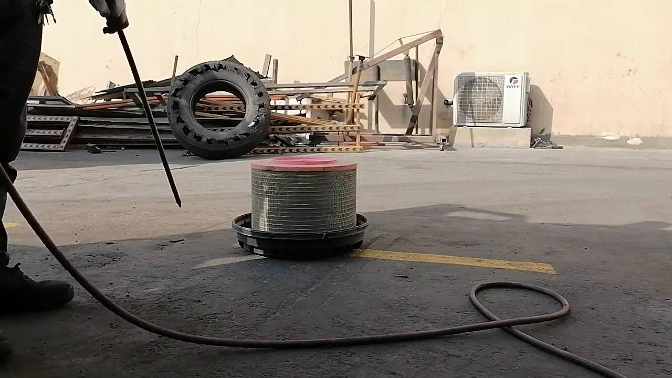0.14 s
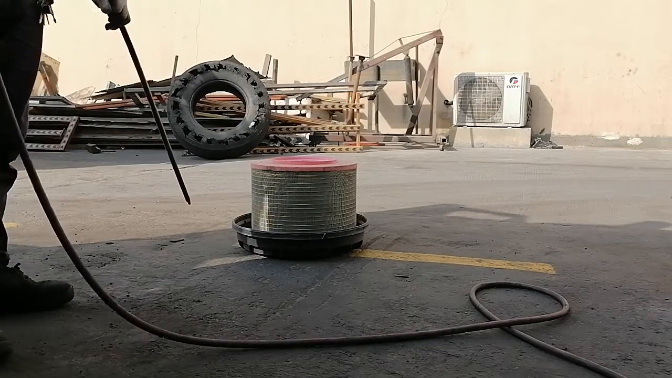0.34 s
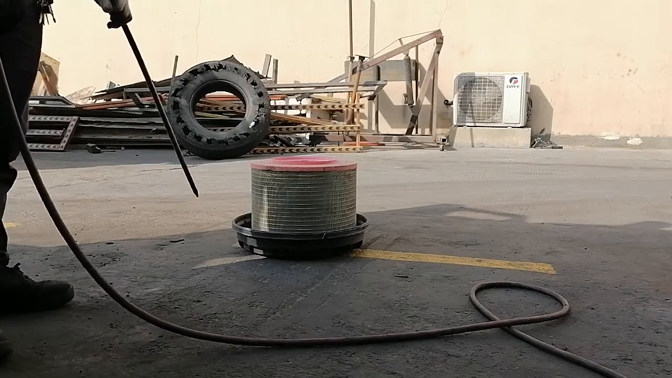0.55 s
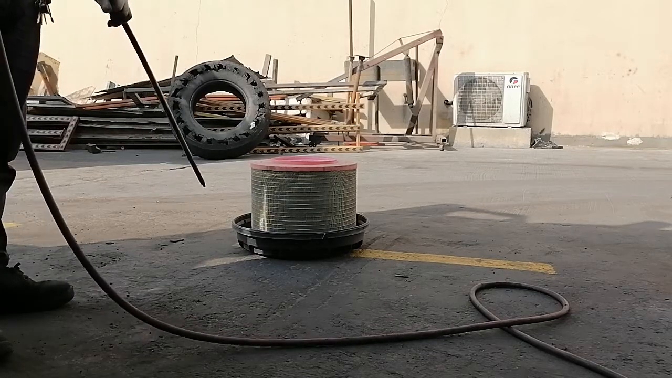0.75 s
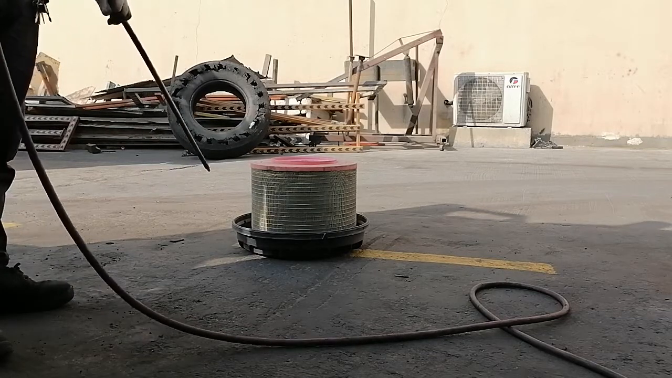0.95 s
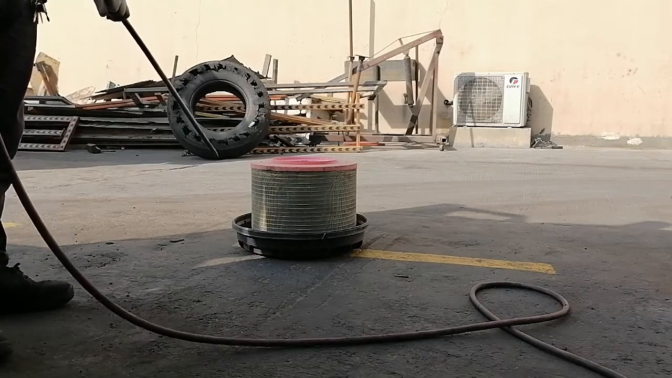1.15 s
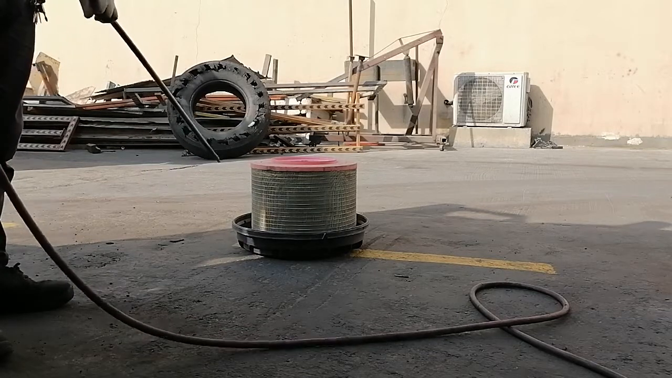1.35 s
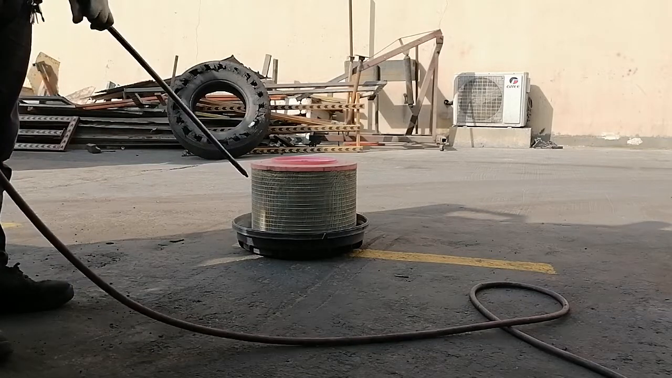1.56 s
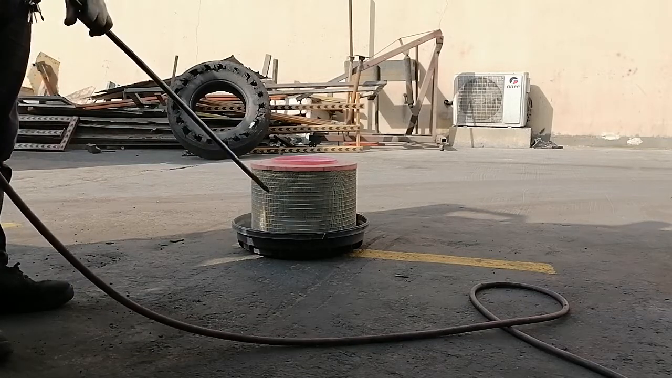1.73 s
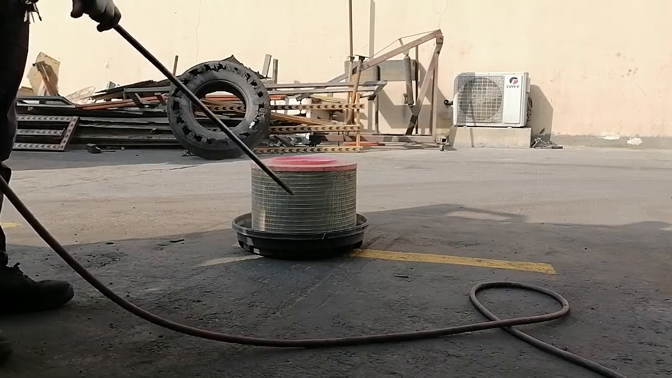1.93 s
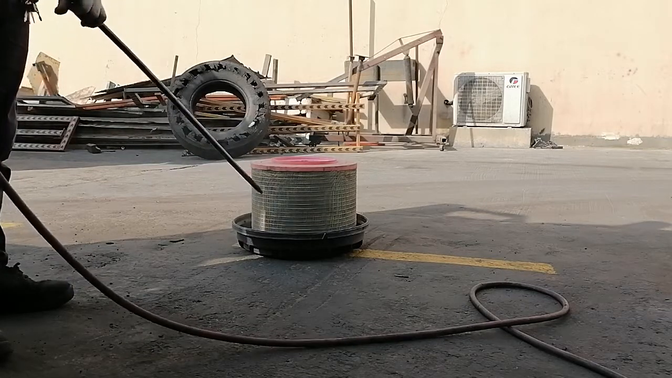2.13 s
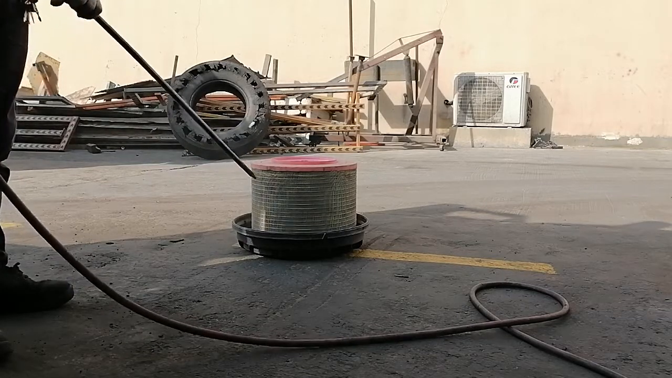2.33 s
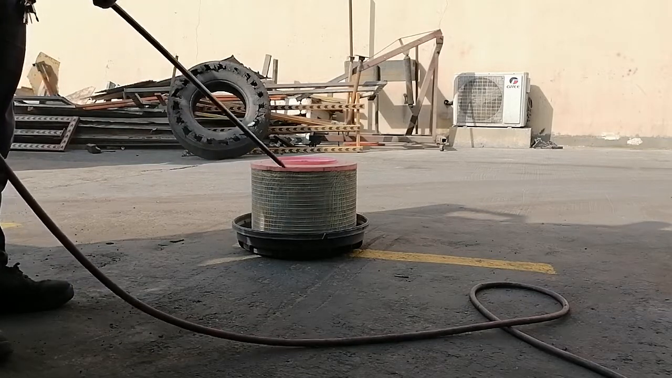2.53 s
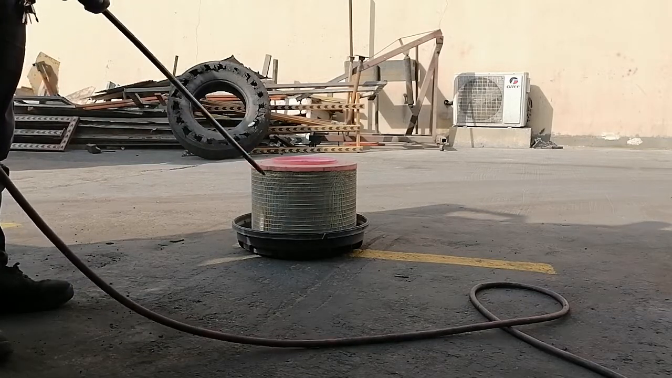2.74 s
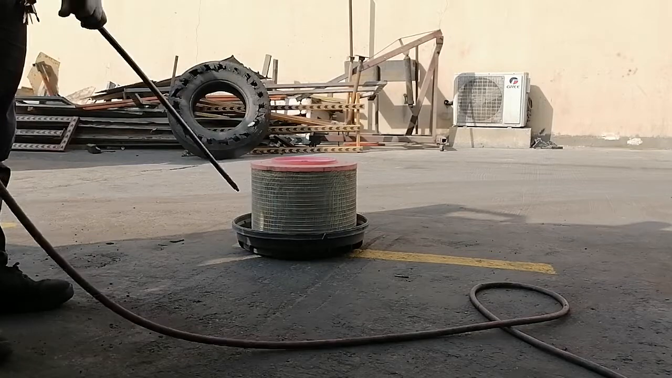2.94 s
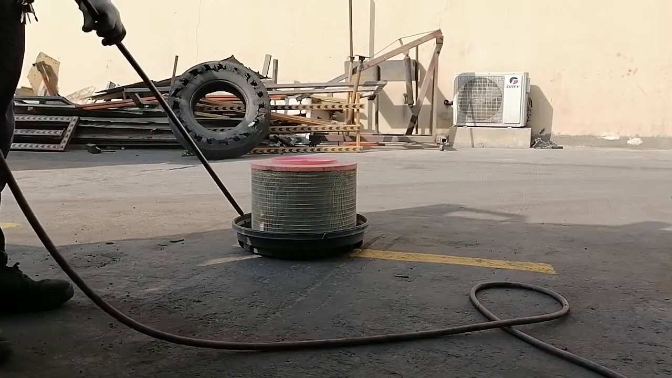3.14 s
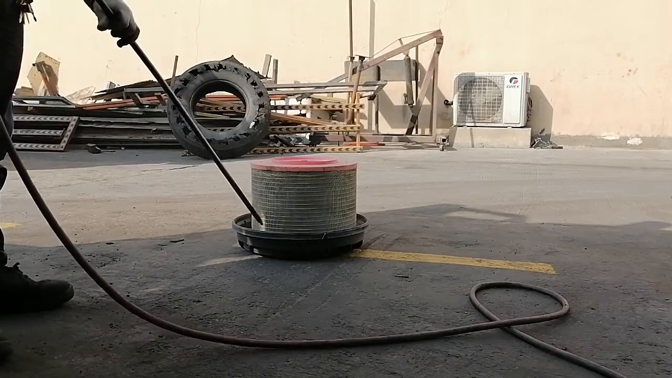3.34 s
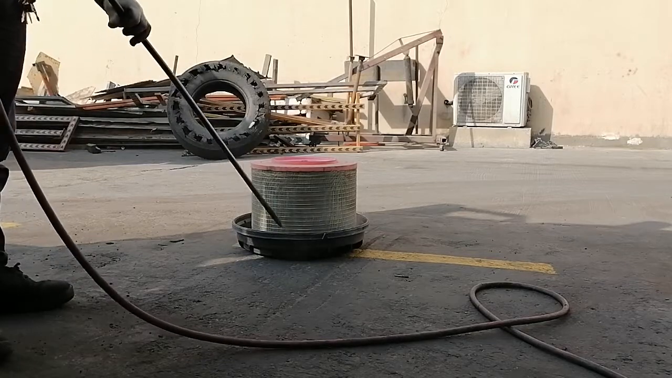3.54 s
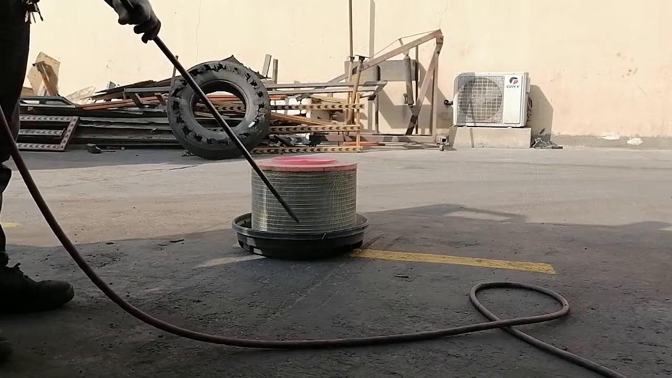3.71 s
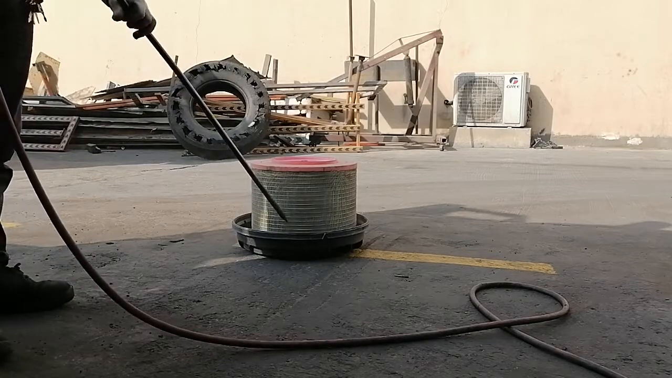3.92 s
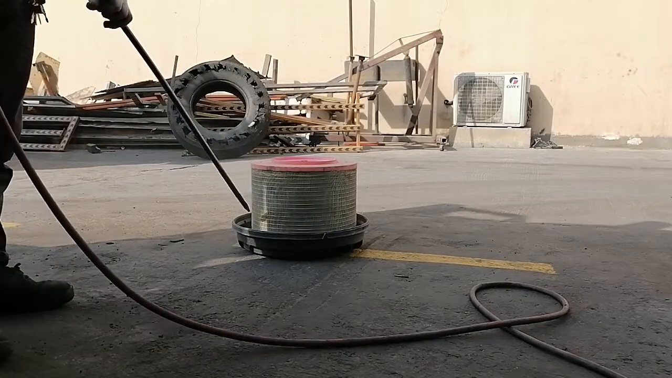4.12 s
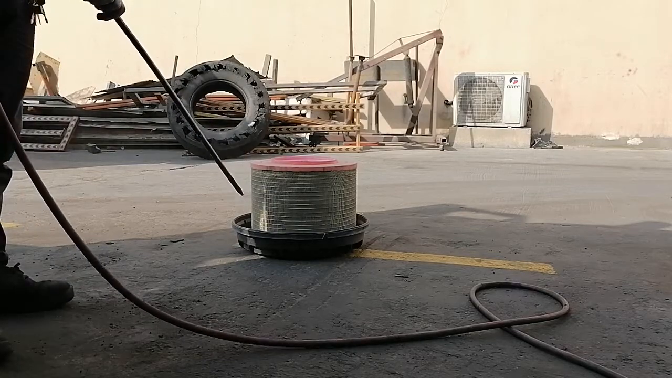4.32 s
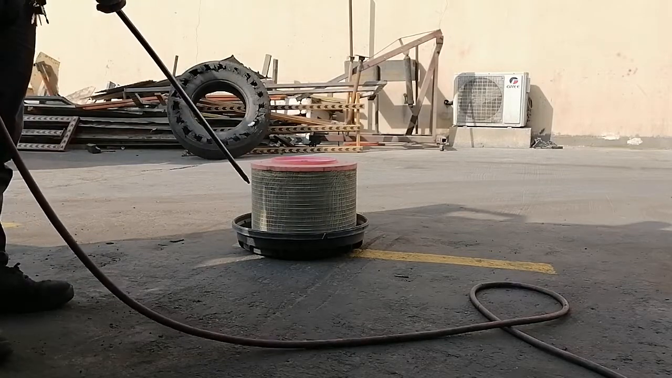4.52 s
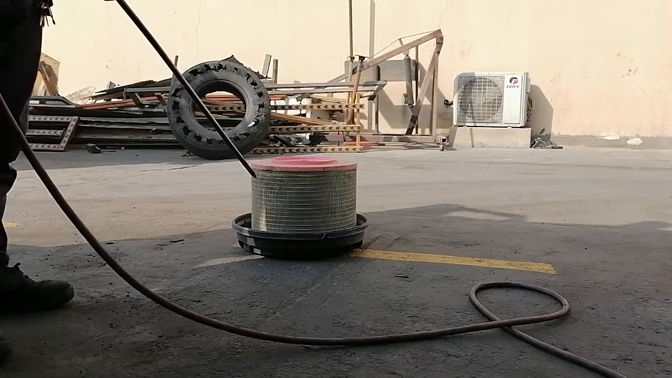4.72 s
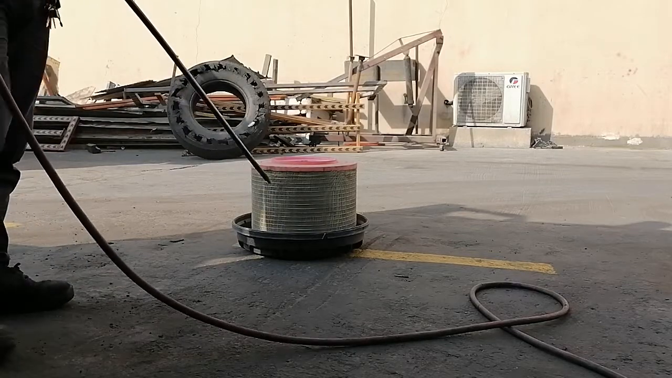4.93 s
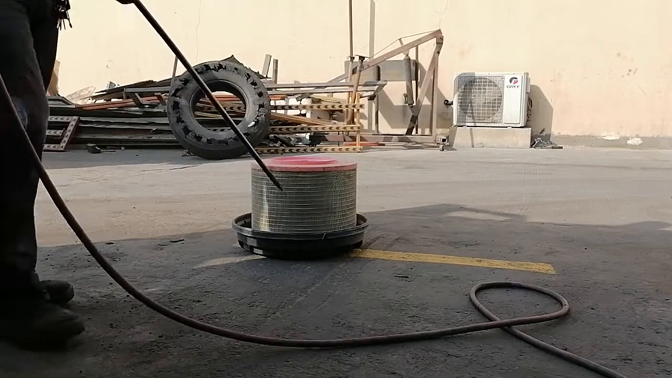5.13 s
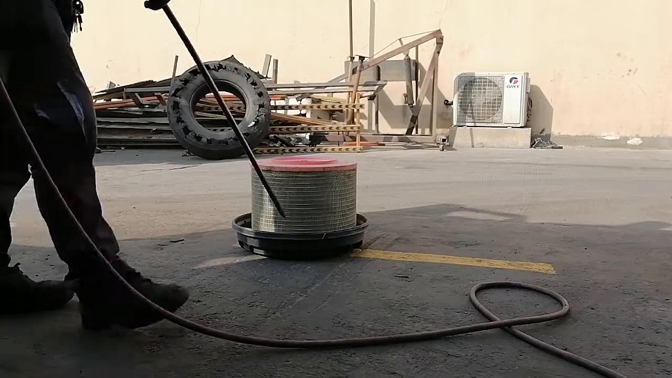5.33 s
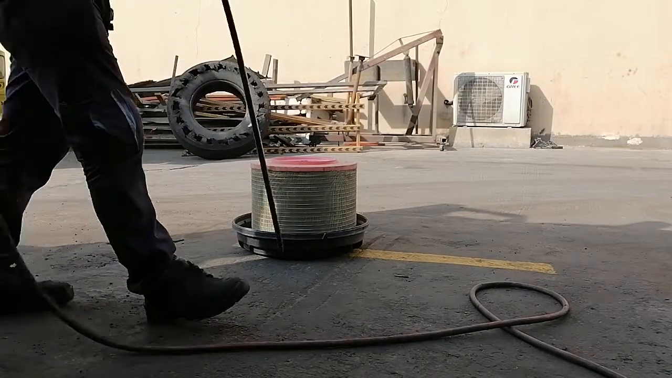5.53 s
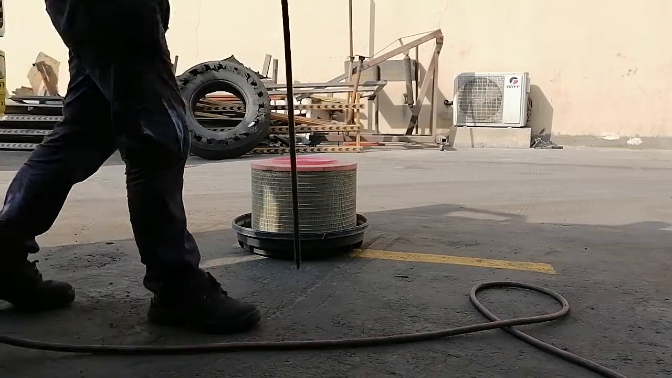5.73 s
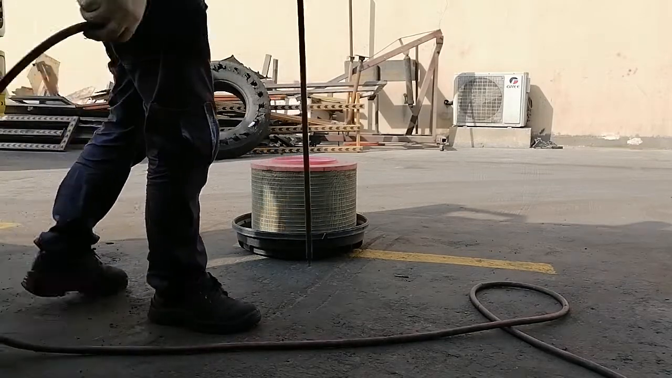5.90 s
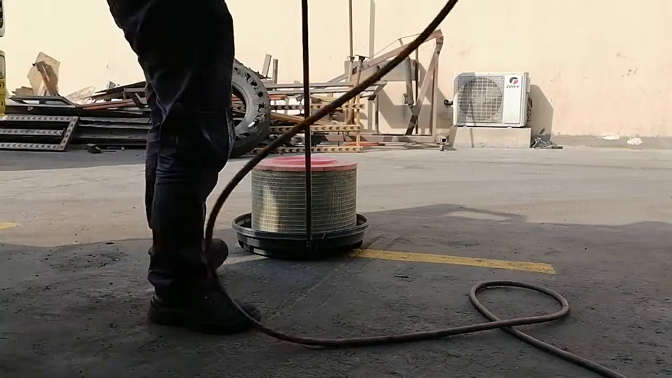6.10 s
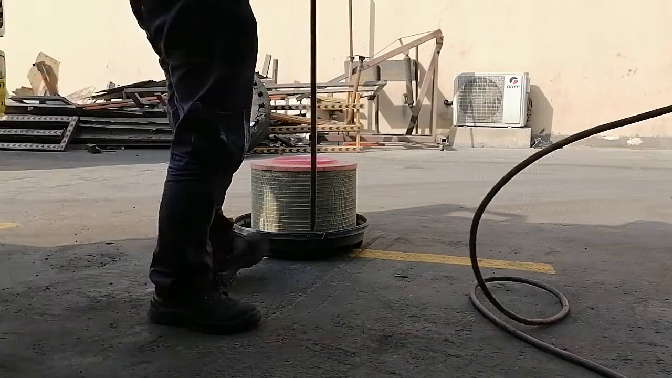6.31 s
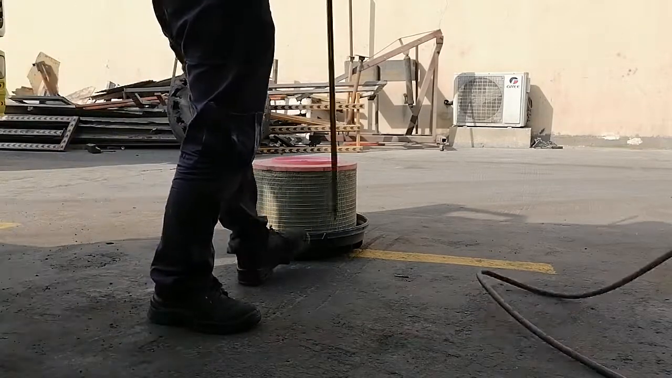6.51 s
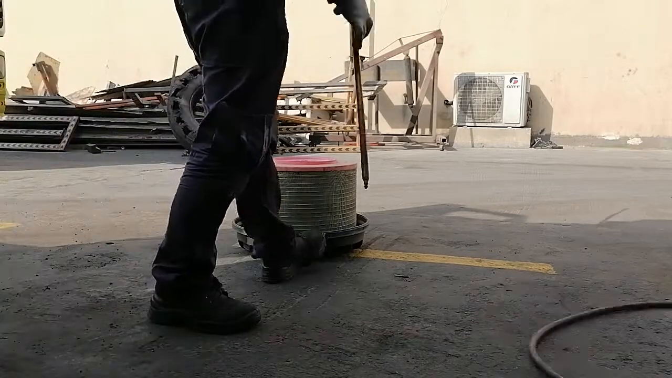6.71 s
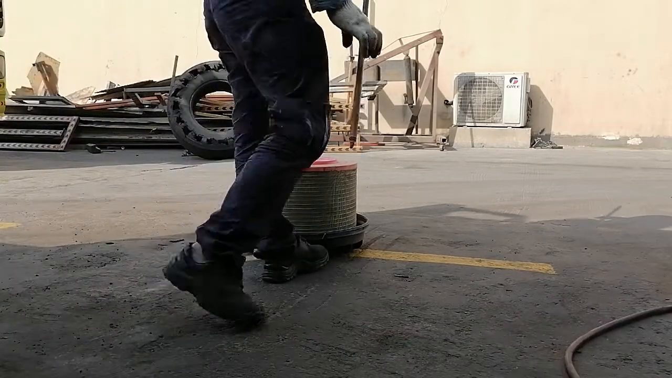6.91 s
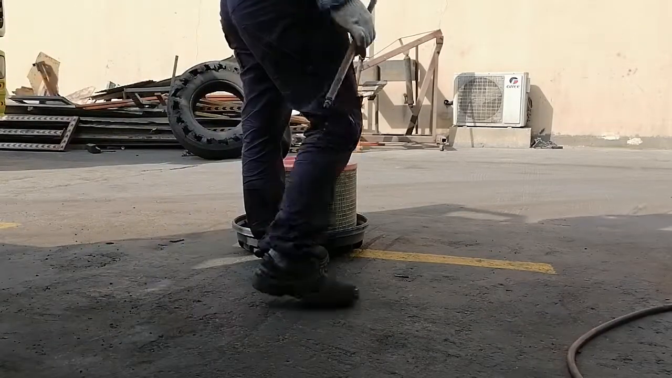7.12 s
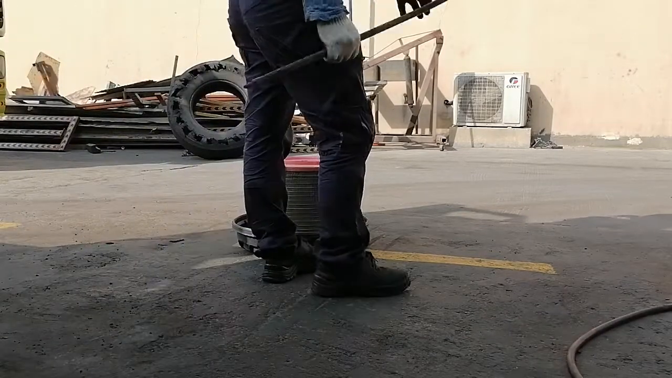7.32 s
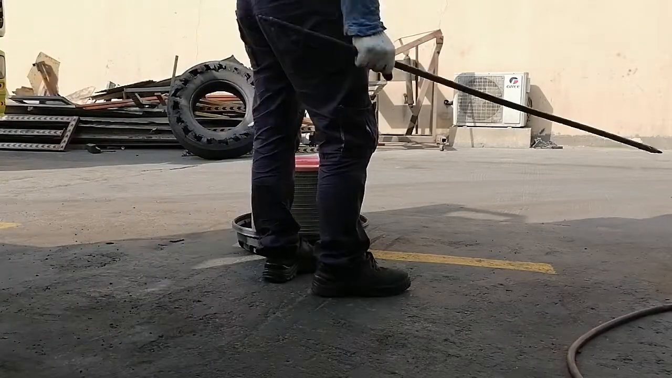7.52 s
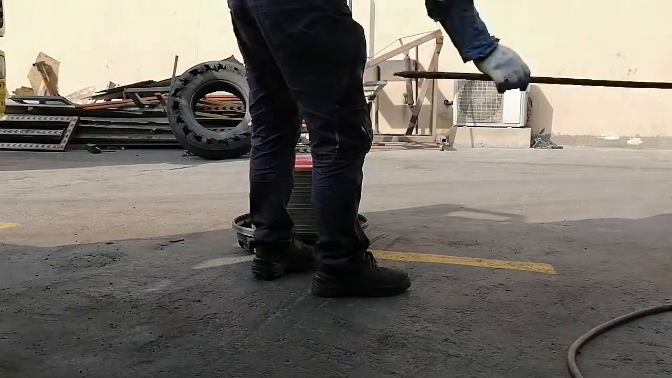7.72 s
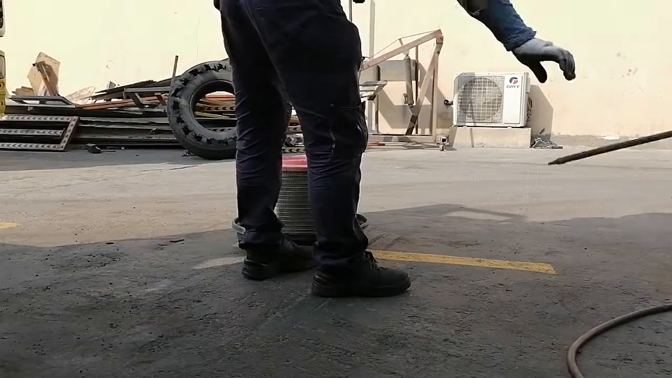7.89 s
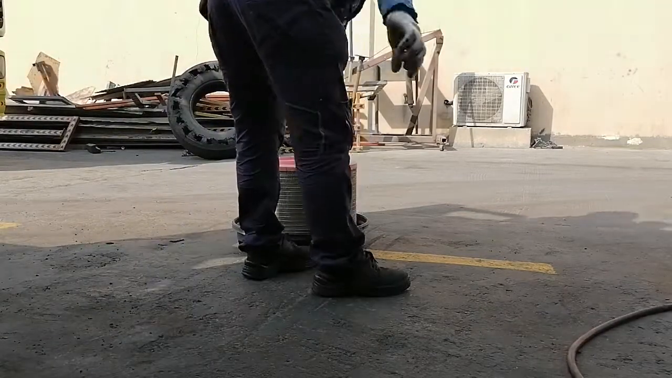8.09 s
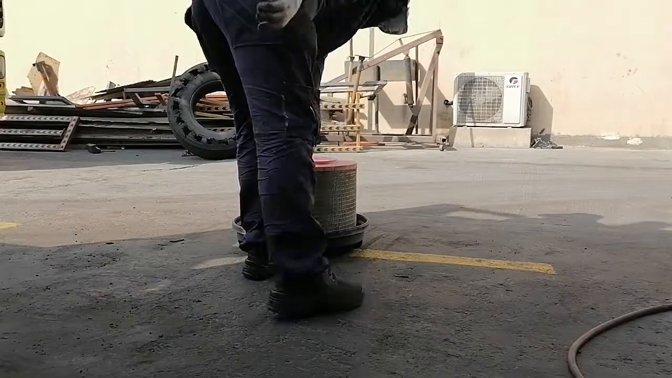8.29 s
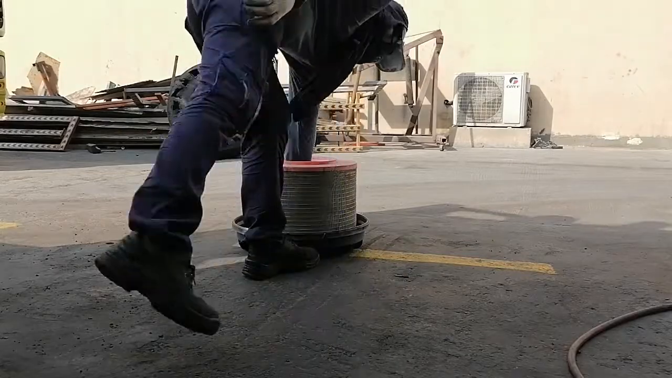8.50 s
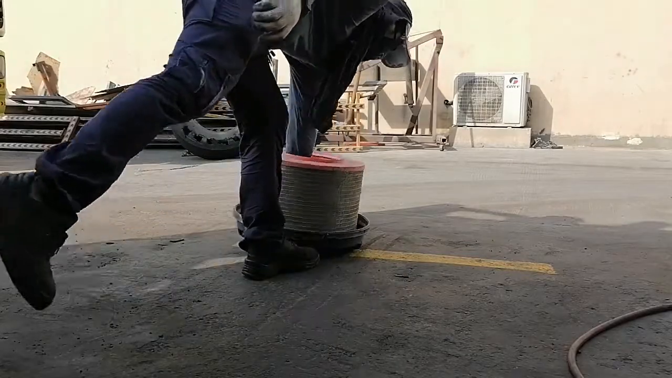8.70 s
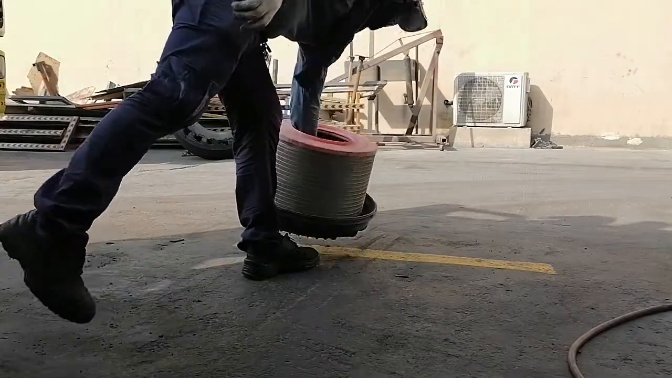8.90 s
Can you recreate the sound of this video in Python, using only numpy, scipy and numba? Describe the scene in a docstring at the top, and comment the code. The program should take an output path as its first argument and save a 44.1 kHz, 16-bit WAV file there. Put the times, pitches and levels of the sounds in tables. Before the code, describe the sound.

Compressed air hisses steadily from a lance into a filter, then a hose uncouples with two spurts and the steel lance clatters down ringing.

```python
"""Air lance in a concrete yard

Over a low rumble, a worker blows out an air filter with a long steel lance. The turbulent jet hisses,
comb-filtered by its moving ground reflection, and roars where it enters the pleats. The hose uncouples
with a squeak and two spurts of air; the lance is dropped and rings in its bending modes at each bounce.
An automatic gain control ducks the whole sound, rumble included, while the treble is strong."""
import sys
import numpy as np
from scipy import signal
from scipy.fft import rfft, irfft, next_fast_len
from scipy.io import wavfile
from scipy.ndimage import map_coordinates
from numba import njit

SR = 44100
rng = np.random.default_rng(int(sys.argv[2]) if len(sys.argv) > 2 else 0)


def file_out(sig):
    """Save sig as 16-bit WAV at sys.argv[1]."""
    # one column per channel
    cols = np.atleast_2d(sig).T
    # limit, then scale
    lim = np.clip(cols, -1, 1)
    pcm = np.round(lim * 32767).astype(np.int16)
    wavfile.write(sys.argv[1], SR, pcm)


N = 394689
T = np.arange(N) / SR


def undb(db):
    """Amplitude ratio of a level in decibels."""
    return 10 ** (np.asarray(db) / 20)


def unit(x):
    """Normalisation to rms 1."""
    return x / np.sqrt(np.mean(x ** 2))


def curves(rows):
    """Linear interpolation of a table's columns in time."""
    times, *columns = np.transpose(rows)
    return [np.interp(T, times, column) for column in columns]


def noise(spectrum, size=N):
    """Spectral shaping: noise of rms 1 through (frequency [Hz], level [dB]) points, with sloping ends."""
    n = next_fast_len(size, True)
    hz, db = np.transpose(spectrum)
    f = np.arange(n // 2 + 1) * SR / n + 1
    gain = undb(np.interp(np.log(f), np.log(hz), db))
    roll_off = np.minimum(f / hz[0], 1) * np.minimum(hz[-1] / f, 1) ** 2
    return unit(irfft(rfft(rng.standard_normal(n)) * gain * roll_off, n)[:size])


def wide(spectrum, side_db, size=N):
    """Partial coherence: a common noise plus a side noise in antiphase between the channels."""
    side = undb(side_db) * noise(spectrum, size)
    return unit(noise(spectrum, size) + np.array([side, -side]))


def walk(rate_hz, size=N):
    """Random modulation: interpolated Gaussian values with a spread near 1."""
    steps = rng.standard_normal(int(size / SR * rate_hz) + 2)
    return 1.53 * np.interp(np.arange(size) / SR * rate_hz, np.arange(len(steps)), steps)


def delayed(x, ms):
    """Propagation delay, constant or varying in time."""
    return map_coordinates(x, [np.arange(len(x)) - ms * SR / 1000], order=3)


def from_right(x, lag_ms):
    """Time difference of arrival: a source on the right reaches the left channel later."""
    return np.array([delayed(x, lag_ms), x])


def fade(t, t60):
    """Exponential decay, by 60 dB in t60 seconds."""
    return np.exp(-np.log(1000) * t / t60)


def envelope(s, hold, rise, fall):
    """Gaussian rise to 1 at time s, hold, exponential decay; rise and fall are the times for 20 dB."""
    return undb(-20 * ((np.maximum(s - T, 0) / rise) ** 2 + np.maximum(T - s - hold, 0) / fall))


def add(out, s, x):
    """Superposition of a two-channel sound starting at time s."""
    i = int(s * SR)
    out[:, i:i + x.shape[1]] += x[:, :N - i]


def yard(x, wet_db, size=22050):
    """Reverberation: the wall and stacked scrap add diffuse reflections, uncorrelated left and right."""
    t = np.arange(size) / SR
    decay = fade(t, t60=0.48) + 3.3 * fade(t, t60=0.029)
    tail = rng.standard_normal((2, size)) * decay * (t > .002)
    tail /= np.sqrt(np.sum(tail ** 2, axis=1, keepdims=True))
    return x + undb(wet_db) * signal.fftconvolve(x, tail, axes=1)[:, :N]


# rumble as the worker steps, shifts and bends: (time [s], hold [s], rise [s], fall [s], level [dB])
RUMBLE_SWELLS = [(5.3, 0.12, 0.26, 0.29, -45), (5.95, .1, 0.25, 1, -53.5), (8.398, .2, 0.39, .3, -47),
                 (8.87, .08, 0.42, .3, -41.5)]
# spectra of the yard's rumble and faint hiss: (frequency [Hz], relative level [dB])
RUMBLE_SPECTRUM = [(20, -3), (40, 5), (80, 0.5), (160, -2), (270, -3.5), (400, -13), (650, -18.5),
                   (1500, -52)]
AMBIENT_SPECTRUM = [(200, 4), (700, 1), (1100, 0), (2000, -8), (3000, -8), (3950, -14.5), (4500, -2.5),
                    (4750, -8), (5100, -1), (5800, -12), (7300, -4), (9000, -16.5), (12500, -24.5),
                    (15000, -30)]


def background():
    """Ambient noise: a largely coherent rumble, whose swells add in power, and a faint diffuse hiss."""
    swells = sum(undb(db) * envelope(*timing) for *timing, db in RUMBLE_SWELLS)
    rumble = np.hypot(undb(-52.5), swells) * undb(0.87 * walk(14)) * wide(RUMBLE_SPECTRUM, side_db=-13)
    hiss = undb(-59.5 + 0.5 * walk(3.4)) * wide(AMBIENT_SPECTRUM, side_db=0.47)
    return rumble + hiss


# a low hum and thin whistles in the yard: (frequency [Hz], bandwidth [Hz], relative level [dB])
TONES = [(263.6, 16, -64), (4440, 60, -81), (5173, 90, -86)]


def tones():
    """Narrow-band noise: random quadrature parts make each tone drift in amplitude and phase."""
    out = np.zeros((2, N))
    for hz, width_hz, db in TONES:
        phase = 2 * np.pi * hz * T
        for channel in out:
            channel += undb(db) * (walk(width_hz) * np.cos(phase) + walk(width_hz) * np.sin(phase))
    return out


# ticks of the lever and the hose in the hand: (time [s], level [dB])
TICKS = [(0.806, -50.5), (.838, -47.5), (0.9223, -38.5), (7.18, -55), (7.244, -55)]
# spectra of a tick and of the spit of air: (frequency [Hz], relative level [dB])
TICK_SPECTRUM = [(1200, -28), (2400, 2.5), (4000, -9), (5800, 2), (6800, -4), (7900, 7), (9500, -17),
                 (15000, -25)]
SPIT_SPECTRUM = [(4500, -22), (5400, 2), (5900, 0), (6600, -16), (9000, -25)]


def trigger(size=8000):
    """Damped transients: handling ticks, and a spit of air as the lever takes up its slack."""
    out, t = np.zeros((2, N)), np.arange(size) / SR
    tick_decay = fade(t, t60=0.025) + .12 * fade(t, t60=0.35)
    for s, db in TICKS:
        add(out, s, undb(db) * tick_decay * wide(TICK_SPECTRUM, 1.5, size))
    spit = undb(-56.5) * fade(t, t60=0.38) * wide(SPIT_SPECTRUM, -1, size)
    add(out, .925, spit)
    return yard(out, wet_db=-11)


def valve(t60, open_s=1.1765, shut_s=5.13):
    """Gating of the flow: a fast linear onset, then exponential decay once the valve shuts."""
    return np.clip((T - open_s) / 0.016, 0, 1) * fade(np.maximum(T - shut_s, 0), t60)


# the open jet, duller beside the filter: (time [s], hiss level [dB], fine spray level [dB])
JET_LEVELS = [(1.2, -30.5, -35.5), (1.5, -30.5, -33.5), (1.72, -31, -32), (1.95, -27.5, -34),
              (2.1, -28.5, -31), (2.62, -30, -33.5), (2.84, -34, -33), (2.94, -37, -38), (3.6, -32, -42),
              (3.95, -33.5, -39.5), (4.2, -36.5, -39.5), (4.65, -32, -31.5), (5.1, -32.5, -35.5)]
# rise and fall of the nozzle: (time [s], height [m])
NOZZLE_HEIGHTS = [(1.2, 0.35), (1.68, .31), (1.87, .19), (2.3, 0.24), (2.45, 0.4), (2.7, 0.37), (3.1, 0.17),
                  (3.85, 0.18), (4.6, .26), (4.9, .32)]
# the jet grazes a filter edge: (time [s], hold [s], rise [s], fall [s], rasp [dB], added hiss [dB])
GRAZES = [(1.581, .025, 0.078, 0.059, -37.5, -36), (1.79, 0.062, .06, 0.22, -37, -31),
          (2.084, .2, 0.2, .1, -34.5, -41), (2.337, 0.023, 0.048, .08, -35.5, -33),
          (2.842, 0.065, 0.063, 0.1, -39, -34), (3.19, 0.1, 0.093, .15, -42.5, -60),
          (3.267, 0.13, 0.053, 0.18, -50, -53), (3.849, 0.053, 0.25, 0.086, -42, -34.5),
          (4.478, 0.28, 0.23, .4, -40.5, -39), (4.995, 0.066, 0.15, 0.093, -44, -34)]
# brief dips in the jet's level: (time [s], hold [s], rise [s], fall [s], depth [dB])
DIPS = [(2.48, 0.016, 0.069, .015, 6.5), (2.723, 0.043, 0.049, 0.08, 4)]
# spectra of the jet's three parts: (frequency [Hz], relative level [dB])
HISS_SPECTRUM = [(400, -36), (1600, -59), (2700, -18), (4200, -14.5), (6000, -4), (7200, 6.5), (8200, 4.5),
                 (9200, -9.5), (11000, -44), (15500, -34)]
RASP_SPECTRUM = [(1200, -58), (2000, -7.5), (2700, 3), (3300, 3), (4000, -4.5), (5200, 5), (6500, -5.5),
                 (10000, -27)]
SPRAY_SPECTRUM = [(7000, -2), (9800, 8), (11500, 4.5), (14000, 2), (15000, 6.5), (16000, -14)]
LISTENER_HEIGHT_M, DISTANCE_M, SOUND_SPEED_M_S = 0.446, 2.65, 343


def jet():
    """Turbulent jet noise, rasping at edges; interference with its ground echo sweeps a comb filter."""
    hiss_db, spray_db = curves(JET_LEVELS)
    hiss, rasp = undb(hiss_db), undb(hiss_db - 17)  # in open air the rasp is weak
    for *timing, rasp_db, added_db in GRAZES:
        touch = envelope(*timing)
        hiss = np.hypot(hiss, undb(added_db) * touch)
        rasp = np.hypot(rasp, undb(rasp_db) * touch)
    parts = [(hiss, HISS_SPECTRUM), (rasp, RASP_SPECTRUM), (undb(spray_db), SPRAY_SPECTRUM)]
    air, left, right = (sum(gain * noise(spectrum) for gain, spectrum in parts) for _ in range(3))
    # the concrete mirrors the nozzle as an image source
    height_m, = curves(NOZZLE_HEIGHTS)
    extra_path_m = 2 * height_m * LISTENER_HEIGHT_M / DISTANCE_M
    air = air + undb(-5.5) * delayed(air, ms=1000 * extra_path_m / SOUND_SPEED_M_S)
    # the jet is on the left: later and weaker on the right
    direct = valve(t60=0.037) * np.array([air, undb(-2) * delayed(air, ms=0.059)])
    # hiss scattered round the yard outlasts the flow
    diffuse = undb(-0.5) * valve(t60=0.27) * np.array([left, right])
    flutter_db = .5 * (walk(16) + walk(45) + walk(300))
    dip_db = sum(depth_db * envelope(*timing) for *timing, depth_db in DIPS)
    return (direct + diffuse) * undb(flutter_db - dip_db)


# sweeps of the jet into the pleats:
# (time [s], hold [s], rise [s], fall [s], level [dB], centre frequency [Hz], glide [octaves/s])
PASSES = [(1.492, 0.083, 0.047, 0.053, -43, 517.6, 1.9), (2.021, 0.049, .24, 0.23, -46, 900.7, 1),
          (2.279, 0.041, 0.18, 0.065, -46.5, 880, -.5), (3.141, 0.12, .25, .11, -32.5, 890.3, 2),
          (3.38, .3, 0.1024, 0.081, -47, 998.5, -.1), (3.82, .03, .16, .12, -36.5, 881.2, -.6),
          (4.2, .12, .15, 0.28, -35, 900.2, -2.5)]
# spectrum of the roar before it glides: (frequency [Hz], relative level [dB])
ROAR_SPECTRUM = [(150, -12), (300, -8.5), (500, -1), (800, 3), (1100, -0.5), (1600, -9), (2200, -16.5),
                 (4000, -29)]


def pleats(glide_span_s=.25):
    """Jet impingement: a hollow, fluttering roar whose spectral peak slides with the spot struck."""
    gains, centres = [], []
    for s, hold, rise, fall, db, hz, glide in PASSES:
        gains.append(undb(db) * envelope(s, hold, rise, fall))
        centres.append(hz * 2 ** (glide * np.clip(T - s, -glide_span_s, glide_span_s)))
    centre_hz = np.average(centres, axis=0, weights=np.array(gains) + 1e-9)
    # reading the noise at a varying speed moves its peak to the centre frequency
    peak_hz = ROAR_SPECTRUM[3][0]
    hollow = map_coordinates(noise(ROAR_SPECTRUM), [np.cumsum(centre_hz / peak_hz)], order=3, mode="wrap")
    flutter = undb(0.56 * walk(60))
    buffeting = undb(-15.5) * noise(RUMBLE_SPECTRUM)
    roar = valve(t60=.1) * sum(gains) * flutter * (hollow + buffeting)
    return yard(np.array([roar, undb(-3) * roar]), wet_db=-6)


# squeaks of the coupling's seal: (time [s], duration [s], frequency [Hz], left level [dB])
SQUEAKS = [(6.7645, 0.004, 7600, -35.5), (6.795, .006, 7300, -36), (6.804, 0.0038, 7630, -17.5),
           (6.816, .012, 7480, -27), (7.7475, 0.0018, 7560, -30.5)]


def seal(size=30000, lead_s=.02):
    """Random frequency modulation: the seal squeaks in short tone pulses with Gaussian envelopes."""
    out, t = np.zeros((2, N)), np.arange(size) / SR
    for s, duration, hz, db in SQUEAKS:
        swell = np.exp(-((t - lead_s) / (duration / 2)) ** 2)
        tone = np.sin(2 * np.pi * np.cumsum(hz + 160 * walk(1510, size)) / SR)
        add(out, s - lead_s, from_right(undb(db) * swell * tone, lag_ms=.41) * [[1], [1.5]])
    return out


# spectrum of the sliding sleeve: (frequency [Hz], relative level [dB])
SLEEVE_SPECTRUM = [(600, 0), (1500, 2), (2800, -1), (4000, -18), (7500, -5), (10000, -21)]


def sleeve():
    """Sliding friction: a short scrape as the coupling's sleeve is pulled back."""
    swell = np.exp(-((T - 6.79) / 0.016) ** 2)
    return undb(-44) * swell * wide(SLEEVE_SPECTRUM, side_db=0)


def ring(modes, forces, lag_ms, scatter_db, waver_hz, size):
    """Modal superposition: damped modes of steel on the right, with reflections that shift as it turns."""
    t, out = np.arange(size) / SR, 0
    for (hz, db, t60), force in zip(modes, forces):
        direct = np.exp(-2j * np.pi * hz * np.array([[lag_ms / 1000], [0]]))
        reflected = np.array([walk(waver_hz, size) + 1j * walk(waver_hz, size) for _ in range(2)])
        vibration = force * undb(db) * fade(t, t60) * np.exp(2j * np.pi * (hz * t + rng.random()))
        out = out + (vibration * (direct + undb(scatter_db) * reflected / np.sqrt(2))).imag
    return out


# spurts of trapped air: (time [s], rise [s], relative burst level [dB], burst t60 [s],
# tail level [dB], tail t60 [s], low cut-off [Hz], ring level [dB])
SPURTS = [(6.802, 0.0094, -31, 0.14, -32.5, 0.76, 390, -39.5),
          (7.4786, 0.0023, -20.5, 0.062, -41, 0.7, 1150, -43.5)]
# spectra of a spurt's burst and tail: (frequency [Hz], relative level [dB])
BURST_SPECTRUM = [(400, -32), (1500, -2.5), (2800, -11), (4500, -1), (7400, 4), (8800, -5), (10500, -13),
                  (15500, -25)]
TAIL_SPECTRUM = [(400, 4.5), (900, 3.5), (1800, -1.5), (3200, -0.5), (4000, -13.5), (5200, -8), (7500, -24),
                 (9500, -43), (15000, -49)]
# modes of the steel fittings, one list per spurt: (frequency [Hz], relative level [dB], t60 [s])
FITTING_MODES = [
    [(3320, -14, 0.98), (4750, 1, 0.42), (6500, 0, 0.31), (7127, 5, 0.34), (7550, 0, .25), (8750, 3, 0.2),
     (10340, -16, 0.21), (11600, -7, 0.14), (12600, -15, 0.22), (13700, -21, 0.21)],
    [(1208, -1, 0.67), (1316, -7, 0.58), (2240, -8.5, 0.59), (3250, -4, 0.57), (5190, -4, 0.51),
     (5970, 0.5, 0.52), (6584, -7, 0.62), (7267, 1, 0.56), (8226, 2, 0.4)],
]


def spurts(size=30000):
    """Pressure release: trapped air escapes in a burst and a fading tail while the fittings ring."""
    out, t = np.zeros((2, N)), np.arange(size) / SR
    for spurt, modes in zip(SPURTS, FITTING_MODES):
        s, rise, burst_db, burst_t60, tail_db, tail_t60, low_hz, ring_db = spurt
        since_peak = np.maximum(t - rise, 0)
        rush = from_right(noise(BURST_SPECTRUM, size), lag_ms=0.456) * undb([[-3.5], [0]])
        burst = undb(burst_db + 6) * fade(since_peak, burst_t60) * rush
        tail = undb(tail_db) * fade(since_peak, tail_t60) * wide(TAIL_SPECTRUM, -0.82, size)
        air = signal.sosfilt(signal.butter(3, low_hz, "high", fs=SR, output="sos"), burst + tail)
        clink = ring(modes, np.ones(len(modes)), lag_ms=0.42, scatter_db=5.5, waver_hz=68.5, size=size)
        add(out, s, np.minimum(t / rise, 1) * (air + undb(ring_db) * clink))
    return out


# bending modes of the lance, many in close pairs: (frequency [Hz], relative level [dB], t60 [s])
LANCE_MODES = [(558, -11, 0.75), (828.6, 1, 1.75), (1138, 7, 0.61), (1167, -6.5, 1.3), (1496, -5.5, 1.75),
               (1539, -0.5, 1.16), (1905, 1, 0.7), (1951, 0.5, 1.13), (2335, -8, 1.26), (2421, -1, 1.27),
               (2864, -2, 0.64), (2950, -3, 0.73), (3393, -5, 0.61), (3490, -5, 0.57), (3820, -27, 0.39),
               (4000, -11, 0.53), (4060, -13, 0.7), (4660, -13, .6), (4694, -8.5, 0.55),
               (5260, -11.5, 0.34), (5340, -16, 0.68), (5900, -10.5, 0.34), (6550, -11, 0.19),
               (6780, -6, 0.19), (7000, -2, 0.27), (7550, 0, 0.29), (8230, -5, 0.28), (9000, -10.5, 0.24),
               (9830, -13, 0.4), (10400, -17, 0.36)]
# bounces on the concrete: (time [s], ring level [dB], low cut-off [Hz], contact cut-off [Hz],
# relative clatter level [dB], grit level [dB], grit t60 [s])
BOUNCES = [(8.062, -26, 2260, 7700, -31.5, -48, .04), (8.17, -22.5, 670, 8600, -32.5, -40, .08),
           (8.243, -34.5, 2500, 10000, -50, -34, .02), (8.4765, -21, 706, 6100, -32.5, -45, .03),
           (8.5173, -20, 3060, 5250, -36, -36.5, 0.32), (8.655, -31, 596, 2000, -60, -70, .1),
           (8.7363, -48, 910, 4500, -45.5, -68, .1), (8.8216, -32.5, 1530, 2800, -47, -62, 0.36)]
# spectra of the chattering tube and the sand crushed under it: (frequency [Hz], relative level [dB])
CLATTER_SPECTRUM = [(200, -37), (550, 0), (1200, -5.5), (2800, 3.5), (4200, -8.5), (7000, -8),
                    (9500, -21.5), (11000, -29), (15000, -36)]
GRIT_SPECTRUM = [(3000, -8), (7500, 0), (9000, -10), (10200, 6), (11200, -6), (12500, -11), (15000, -11)]


def lance(size=40000):
    """Impact excitation: every bounce strikes the same modes; a harder contact reaches higher ones."""
    out, clatter, t = np.zeros((2, N)), np.zeros((2, N)), np.arange(size) / SR
    hz = np.array(LANCE_MODES)[:, 0]
    onset = np.minimum(t / 0.0082, 1)
    chatter_decay = fade(t, t60=0.035) + 0.32 * fade(t, t60=0.73)
    for s, db, low_hz, contact_hz, clatter_db, grit_db, grit_t60 in BOUNCES:
        forces = undb(db) / np.sqrt((1 + (low_hz / hz) ** 4) * (1 + (hz / contact_hz) ** 6))
        ringing = ring(LANCE_MODES, forces, lag_ms=0.332, scatter_db=-2.5, waver_hz=28.33, size=size)
        chatter = undb(clatter_db + 3.5 * walk(400, size)) * chatter_decay * noise(CLATTER_SPECTRUM, size)
        grit = undb(grit_db + 2 * walk(600, size)) * fade(t, grit_t60) * wide(GRIT_SPECTRUM, -1, size)
        add(out, s, onset * ringing + grit)
        add(clatter, s, from_right(onset * chatter, lag_ms=0.293))
    return out + yard(clatter, wet_db=10.5)


def scene():
    """Linear superposition of all sources in the yard."""
    blowing = jet() + pleats()
    uncoupling = sleeve() + yard(seal() + spurts(), wet_db=-4.5)
    return blowing + uncoupling + lance() + trigger() + background() + tones()


@njit
def follow(x, attack_s, release_s):
    """Envelope detection: a one-pole smoother with separate time constants for rise and fall."""
    smoothed, level = np.empty(len(x)), 0.
    for i in range(len(x)):
        level += (x[i] - level) / (SR * (attack_s if x[i] > level else release_s))
        smoothed[i] = level
    return smoothed


def record(dry, max_cut_db=8.5, knee_db=-42, top_hz=15800):
    """Automatic gain control: treble power lowers the gain over a limited range; a low-pass follows."""
    treble = signal.sosfilt(signal.butter(2, 8000, "high", fs=SR, output="sos"), dry)
    power = follow(np.mean(treble ** 2, axis=0), attack_s=0.0052, release_s=0.044)
    gain_db = -max_cut_db * power / (power + undb(knee_db) ** 2)
    return signal.sosfilt(signal.ellip(10, .2, 70, top_hz, fs=SR, output="sos"), dry * undb(gain_db))


dry = scene()
out = record(dry)
file_out(out)
```